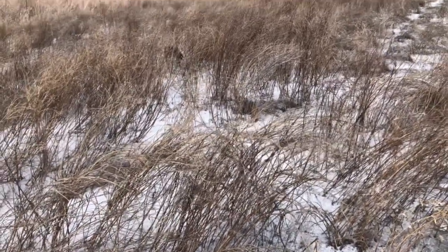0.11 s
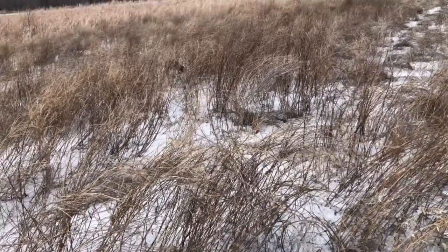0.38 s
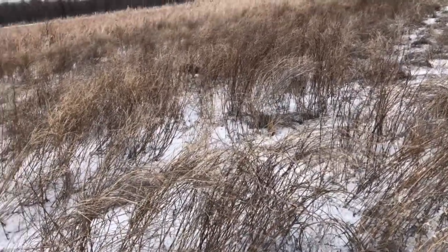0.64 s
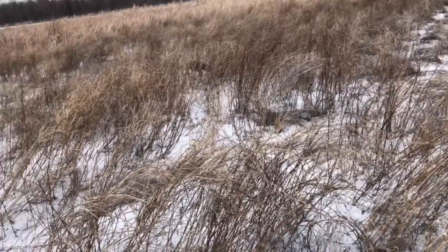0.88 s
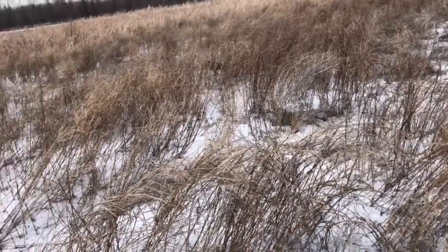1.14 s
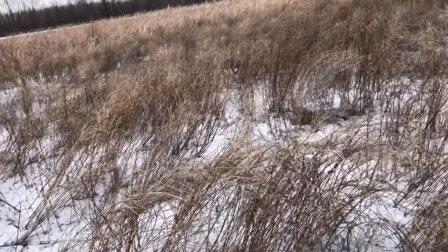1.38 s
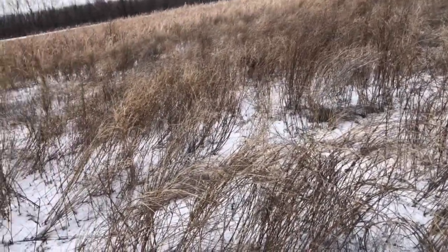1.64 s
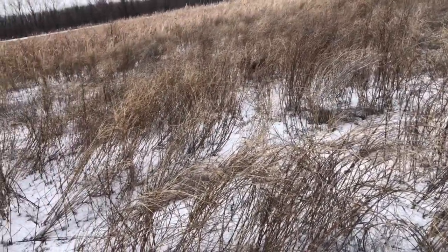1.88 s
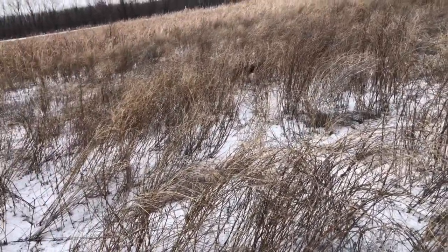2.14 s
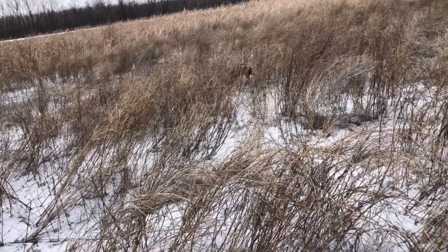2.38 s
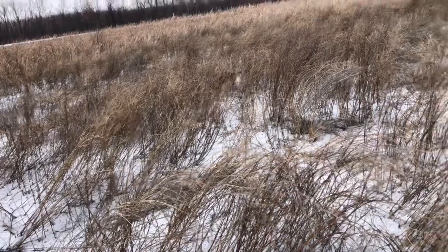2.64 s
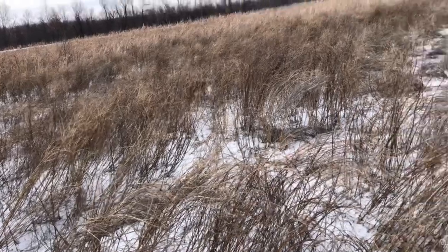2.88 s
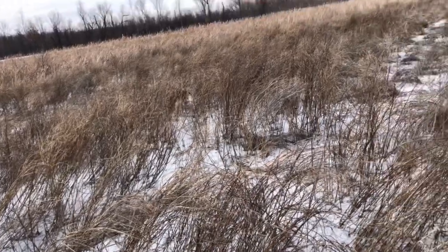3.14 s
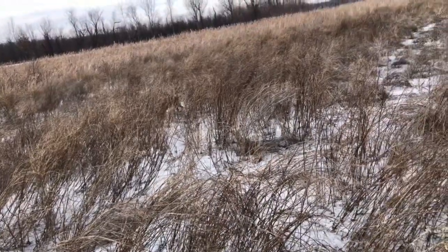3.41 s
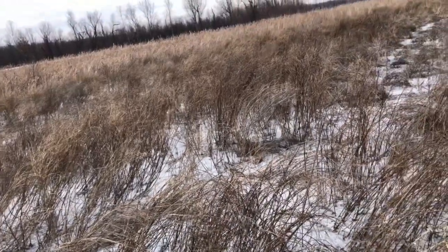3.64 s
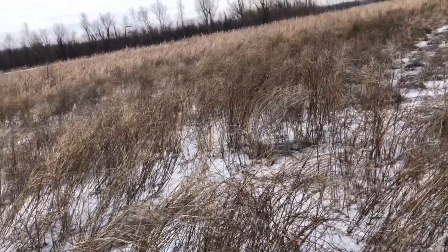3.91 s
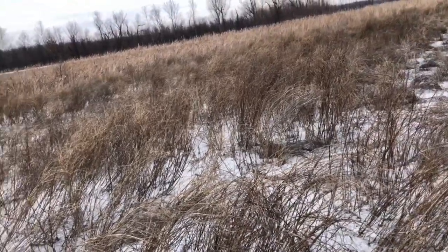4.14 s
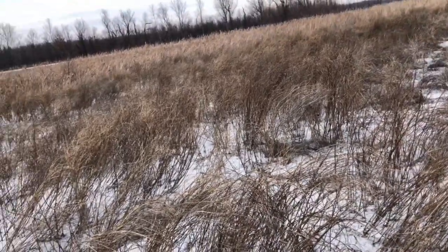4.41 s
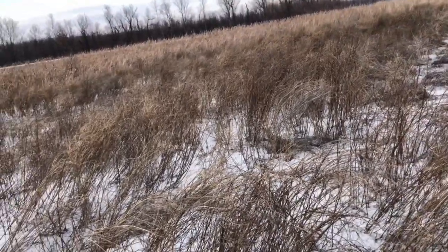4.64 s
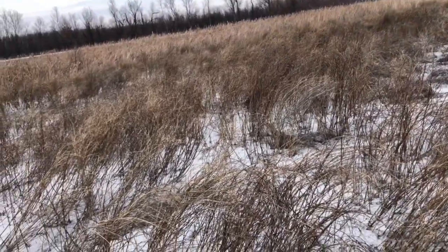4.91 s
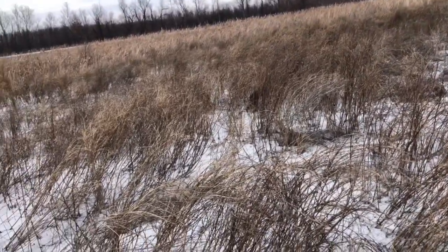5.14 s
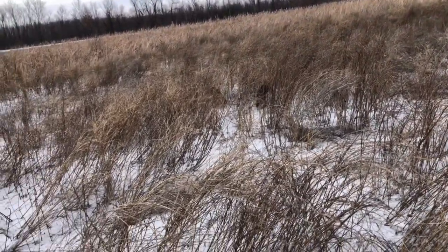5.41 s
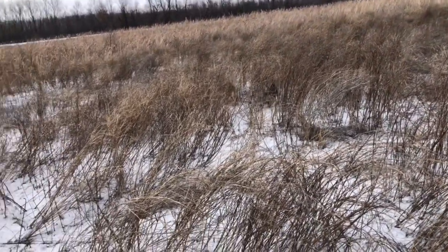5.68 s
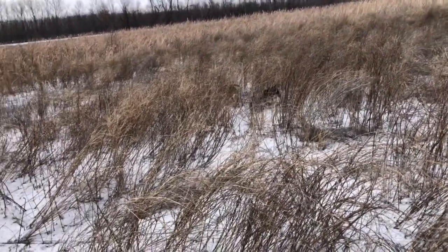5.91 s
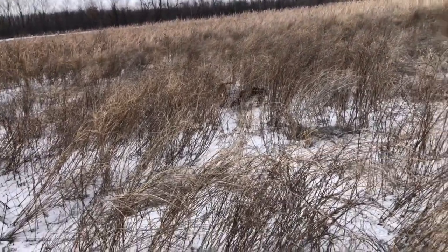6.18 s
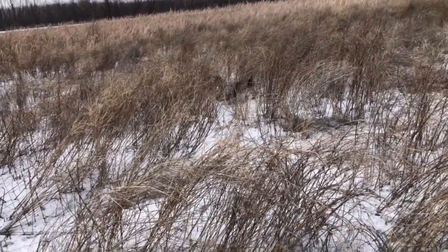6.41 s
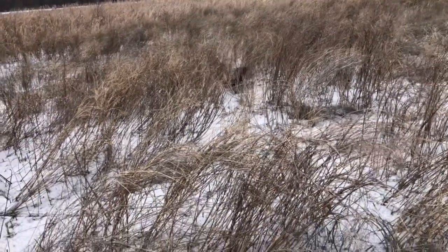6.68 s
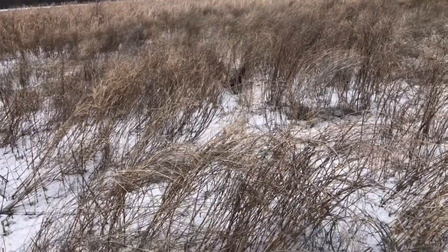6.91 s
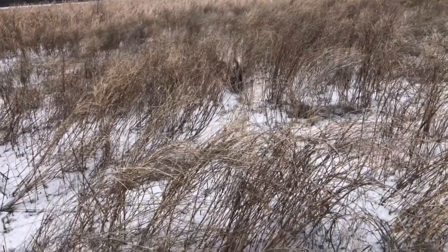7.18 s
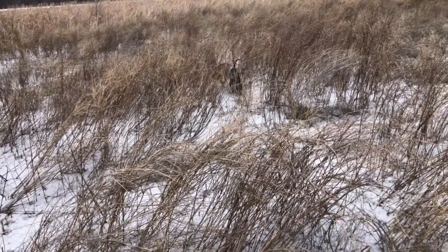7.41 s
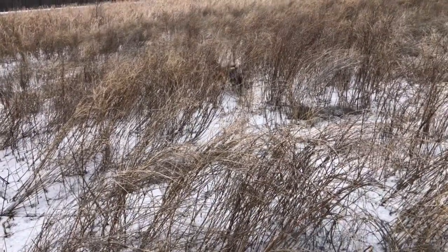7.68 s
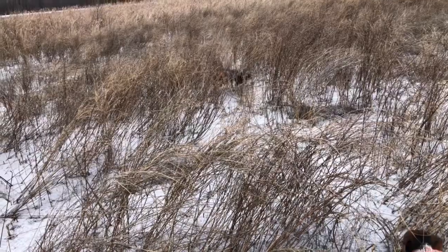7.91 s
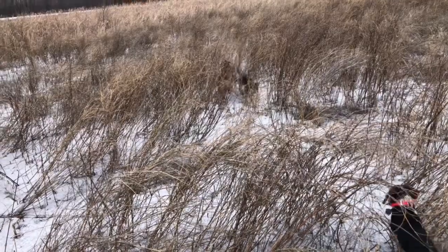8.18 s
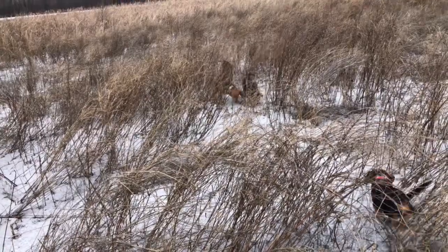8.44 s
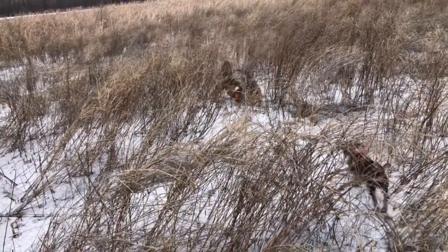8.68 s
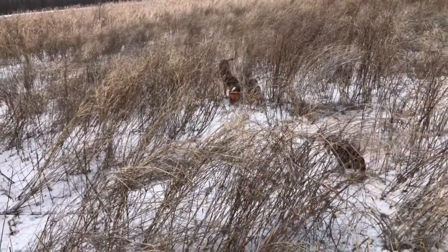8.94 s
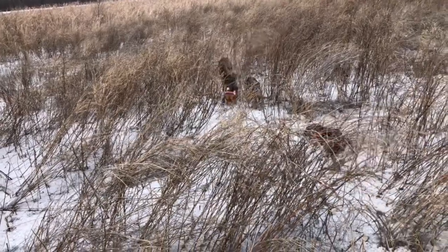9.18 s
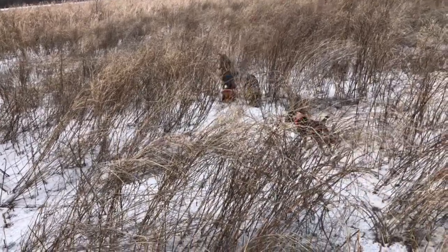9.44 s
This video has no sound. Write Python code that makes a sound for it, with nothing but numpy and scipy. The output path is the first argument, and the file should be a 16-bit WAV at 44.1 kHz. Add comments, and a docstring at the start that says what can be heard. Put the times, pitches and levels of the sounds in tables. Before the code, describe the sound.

An open snowy field, heard through one outdoor microphone for about 9.5 seconds. It begins nearly silent: faint low wind, a small bell clink at 0.1 and 0.3, soft snow crunches and stem ticks from 1.1. At 2.0 a high-voiced hound gives a yip and a hoarse bay of under half a second. Wind swells gently near 3, with tiny yips at 3.2 and 3.6 and paw crunches. A thin wavering whine comes at 4.9, a barely audible whimper at 5.5, then a clear bark at 6.0. The bright collar bell now jingles irregularly, with a snow crunch at 6.4, woody knocks and rustling grass. From 7.1 two hounds bay together; a longer rough bay starts at 7.6, overlapped by barks at 7.7 and 8.3 and squeaky yips at 8.0 and 8.3. Strong barks land at 9.0 and 9.4, bell still clinking. Echo is very faint.

```python
"""Three hounds in a snowy field

They bay, whine, yip and bark: each voice is a stack of partials shaped by a throat, with a rasp where hoarse.
A small collar bell clinks as a sum of dying tones. Paws crunch snow and knock and snap dry stems: short
shaped noises. Grass rustles, wind rumbles on the microphone, and grass and trees return a faint noisy echo."""
import sys
import numpy as np
from scipy import signal
from scipy.fft import rfft, irfft
from scipy.io import wavfile
from scipy.ndimage import uniform_filter1d

SR = 44100
rng = np.random.default_rng(int(sys.argv[2]) if len(sys.argv) > 2 else 0)


def transcribe(u):
    """Save the signal u as a 16-bit wav file named by the first command-line argument.

    u: samples, shape (n,) or (channels, n), limited to [-1, 1]; the rate is SR.
    q: integer samples, one column per channel.
    """
    v = np.clip(np.atleast_2d(u).T, -1, 1)
    q = np.round(v * 32767).astype(np.int16)
    wavfile.write(sys.argv[1], SR, q)


def natural_amplitude(level_db):
    """Convert a level in decibels to a linear amplitude factor, elementwise."""
    exponent = np.asarray(level_db, float) / 20
    return 10 ** exponent


N = 421596
T = np.arange(N) / SR

# resonances of the deep and third hounds' throats: f/Hz, level/dB
DEEP_THROAT = [(1100, 1.5), (1600, 10), (2050, -2.4), (2400, 9.5), (2950, 2.3), (4000, -13.5),
               (8000, -19.5)]
# how every bark opens: t/s from its start, share of pitch, added first and second partial level/dB
BARK_OPENS = [(0, .73, -45, -38), (.019, .86, -15.5, -5.5), (.05, 1, -1, 1.5)]
# how every bark closes: t/s from its end, share of pitch, added first and second partial level/dB
BARK_CLOSES = [(-.045, 0.99, 0, 0.5), (-.024, .9, -16.5, -15), (0, .62, -58, -12.5)]
# thin yips: hound, t/s, length/s, first f/Hz, later f/Hz, level/dB, brightness/dB per octave
YIPS = [("high", 2.003, 0.047, 490, 556, -30.5, 1.2), ("high", 3.245, 0.14, 610, 707, -35, 4.4),
        ("high", 3.578, 0.022, 650, 550, -34, -0.64), ("third", 7.978, 0.037, 1207, 1143, -20, -0.5),
        ("third", 8.015, .03, 990, 810, -26, -20), ("third", 8.33, 0.16, 540, 594, -25, -18)]
SHORT_DULLING_DB = 14  # brightness per octave that a bark, yip or grunt loses by its end


def curve(table):
    """Turns a (t/s, level/dB) table into a gain for every sample."""
    return natural_amplitude(np.interp(T, *np.transpose(table)))


def shape_db(hz, table):
    """Reads a (f/Hz, level/dB) spectrum on a logarithmic pitch axis."""
    f, db = np.transpose(table)
    return np.interp(np.log(np.maximum(hz, 1)), np.log(f), db)


def coloured(table, size=N):
    """Noise with the given spectrum, rms 1."""
    spectrum = rfft(rng.standard_normal(size))
    hz = np.arange(len(spectrum)) * SR / size
    x = irfft(spectrum * natural_amplitude(shape_db(hz, table)), size)
    return x / x.std()


def walk(rate, size=N):
    """Smooth random wandering that turns about rate times a second, spread 1."""
    k = max(int(SR / rate), 2)
    noise = rng.standard_normal(size + 2 * k)
    x = uniform_filter1d(uniform_filter1d(noise, k), k)[k:-k]
    return x * np.sqrt(3 * k / 2)


def add(out, s, x):
    """Mixes x into out from time s."""
    i = int(s * SR)
    out[i:i + len(x)] += x[:len(out) - i]


def band(low_hz, high_hz, order, x):
    """Keeps mainly the part of x between two frequencies; a higher order cuts more steeply."""
    return signal.sosfilt(signal.butter(order, [low_hz, high_hz], "band", fs=SR, output="sos"), x)


def wind():
    """Gusty low rumble on the microphone: coloured noise whose level wanders."""
    # colour of the rumble: f/Hz, level/dB
    rumble_colour = [(20, -19), (70, 3), (230, -9.5), (500, -36.5)]
    # slow rise and fall: t/s, level/dB
    strength = [(0, -59), (2.6, -57), (2.95, -46.5), (3.6, -60.5), (9.56, -56)]
    return coloured(rumble_colour) * curve(strength) * natural_amplitude(3.5 * walk(18))


def field(x):
    """Scattered returns from grass and trees: a fading noise tail far below the direct sound."""
    t = T[:SR]
    fade = np.exp(-t / 0.13) * (1 - np.exp(-t / 0.015))  # swells briefly, then dies away
    tail = coloured([(1500, -15.5), (12000, -44.0)], size=SR) * fade
    return signal.fftconvolve(x, natural_amplitude(-39.0) * tail / np.linalg.norm(tail))[:N]


def grass():
    """A rustle that flickers, random tiny cracks over it, and the louder stems that snap."""
    # colour of the rustle: f/Hz, level/dB
    rustle_colour = [(150, -10.5), (280, 4), (3000, 1), (16000, -1)]
    # rise and fall of rustle and cracks: t/s, level/dB
    strength = [(4.1, -58.5), (4.35, -63), (4.7, -59), (6.3, -55.5), (7.3, -48.5), (9.56, -53)]
    # dry stems that snap: t/s, strength/dB
    snaps = [(1.1196, -28), (1.2067, -27.5), (2.17, -24), (6.7, -29), (7.0152, -22), (8.6018, -24)]
    rustle = coloured(rustle_colour) * natural_amplitude(2.2 * walk(25)) * curve(strength)
    chosen = rng.random(N) < 60 / SR  # about 60 cracks a second
    cracks = chosen * natural_amplitude(10.5 + 4.65 * rng.standard_normal(N)) * curve(strength)
    for s, db in snaps:
        cracks[int(s * SR)] += natural_amplitude(db)
    t = T[:600]
    burst = np.diff(rng.standard_normal(601)) * np.exp(-t / 0.0017)  # every crack is this bright tick
    return rustle + np.convolve(cracks, 0.65 * burst)[:N]


def steps():
    """Snow crust breaking under a paw: a swell of dense low grains."""
    # paw falls: t/s, strength/dB
    falls = [(1.085, -63), (1.463, -57), (3.404, -61.5), (3.617, -54.5), (6.385, -50.5)]
    out, t = np.zeros(N), T[:SR // 4]
    swell = (t / 0.017 * np.exp(1 - t / 0.029)) ** 2
    for s, db in falls:
        crunch = coloured([(200, -6), (1200, -4.0), (2200, -19.5), (16000, -34)], size=len(t))
        grains = natural_amplitude(3 * walk(150, size=len(t)))
        add(out, s - .02, natural_amplitude(db) * grains * swell * crunch)  # the swell begins before the listed time
    return out


def knocks():
    """Stems knocked by passing legs: noise narrowed to a rough woody note that dies in some ten cycles."""
    # knocks: t/s, strength/dB, f/Hz
    hits = [(1.441, -47.5, 840), (5.448, -40, 1070), (5.601, -46.5, 913), (6.628, -43, 1320),
            (6.99, -44.5, 570)]
    out, t = np.zeros(N), T[:SR // 20]
    for s, db, hz in hits:
        ring = band(hz / 1.24, hz * 1.32, 1, rng.standard_normal(len(t)))
        fade = np.exp(-t * hz / 10.2)
        add(out, s, natural_amplitude(db) * ring / ring.std() * fade)
    return out


def bell():
    """Each clapper stroke hits another spot, so the upper modes get new shares; a tick starts it."""
    # strokes: t/s, strength/dB, extra level of the upper modes/dB
    strokes = [(0.121, -49, 3), (0.3195, -54.5, -5), (1.943, -55.5, -5), (4.663, -55, -4),
               (5.701, -46, -21), (5.891, -45, -3), (6.016, -39, 4), (6.047, -41, 5.5), (6.1575, -49.5, 3),
               (6.2643, -43.5, 10.5), (6.357, -38.5, 8), (6.409, -35.5, 1), (6.645, -45, 10),
               (6.7518, -35.5, -1.5), (6.883, -46, 10.5), (7.0238, -42, -9), (7.203, -44, 18.5),
               (7.2604, -37.5, 5), (7.4909, -25.5, 3), (7.5244, -28, 5), (7.5854, -35.5, 0),
               (7.8877, -38.5, -2.5), (8.335, -32.5, 0.5), (8.6404, -33.5, -1.5), (8.7825, -40, 4),
               (8.8584, -32.5, 0.5), (9.188, -42, -27), (9.3343, -47.5, -22), (9.436, -32.5, -7),
               (9.548, -33.5, -6.5)]
    # ringing modes of the bell: f/Hz, level/dB
    modes = [(3153, 8), (5150, -19.5), (6372, -14), (7257, -5.5), (9670, -13), (12160, -6.5), (15150, -10)]
    out, t = np.zeros(N), T[:SR // 4]
    hz, mode_db = np.transpose(modes)[:, :, None]
    t60 = .14 * (hz / hz[0]) ** -.7  # seconds to fall by 60 dB; high modes die sooner
    for s, db, high_db in strokes:
        spot, turn = rng.standard_normal((2, len(modes), 1))
        gain = natural_amplitude(db + mode_db + (hz > hz[0]) * (high_db + 4.6 * spot))
        tones = np.sin(2 * np.pi * hz * (1 + .0015 * turn) * t)
        ring = (gain * tones * 1000. ** (-t / t60)).sum(axis=0)
        noise = np.diff(rng.standard_normal(len(t) + 1))
        tick = natural_amplitude(db + high_db - 0.5) * noise * np.exp(-t / 0.0021)
        add(out, s, ring + tick)
    return out


def flutter(size):
    """Irregular beating at 100-400 a second, spread 1."""
    x = band(110, 420, 2, rng.standard_normal(size))
    return x / x.std()


def dog(calls, brights_db, hoarse_spans, throat):
    """A stack of partials per call; a whine has lost its odd ones, a hoarse stretch beats every few cycles."""
    clear, rasp = np.zeros((2, N))
    for call, (bright_db, dulling_db) in zip(calls, brights_db):
        s, hz, odd_db, even_db = np.transpose(call)
        length = s[-1] - s[0]
        t = np.arange(s[0], s[-1], 1 / SR)
        size = len(t)
        hz, odd, even = (np.interp(t, s, c) for c in (hz, natural_amplitude(odd_db), natural_amplitude(even_db)))
        # the mouth closes as the call ends: brightness changes, resonances get lower
        closing = (t - s[0]) / length
        bright_db = bright_db - dulling_db * closing ** 1.4
        mouth_hz = hz * (1 + 0.22 * closing)

        hoarse, cycles = np.full(size, .08), np.full(size, 2.)
        for a, b, share, count in hoarse_spans:
            inside = (t > a) & (t < b)
            hoarse[inside], cycles[inside] = share, count
        hoarse = np.clip(uniform_filter1d(hoarse, size=300), 0, 1)

        hz = uniform_filter1d(hz, size=400) * (1 + 0.0057 * walk(32.3, size=size))  # unsteady pitch
        phase = 2 * np.pi * np.cumsum(hz) / SR
        shake = 0.27 * flutter(size)
        beat_hz = hz / cycles * (1 + .1 * walk(15, size=size))
        beat_phase = 2 * np.pi * np.cumsum(beat_hz) / SR + 1.1 * walk(70, size=size)
        beat = np.exp(1.1 * np.cos(beat_phase))

        steady, shaken = 0, 0
        for k in range(1, 17):
            db = bright_db * np.log2(k / 2)
            db = db + shape_db(k * mouth_hz, throat) - shape_db(2 * mouth_hz, throat)
            db = db + 4.96 * walk(31.0, size=size) * (k > 2)  # upper partials waver on their own
            if k == 1:
                level = odd
            elif k % 2:
                level = np.minimum(odd, even) * natural_amplitude(db)
            else:
                level = even * natural_amplitude(db)
            steady = steady + level * (1 - hoarse) ** (k / 2) * np.sin(k * phase)
            shaken = shaken + level * np.sin(k * (phase + shake))
        soft_ends = signal.windows.tukey(size, 0.009 / length)
        add(clear, s[0], np.sqrt(2) * steady * soft_ends)
        uneven = natural_amplitude(2.6 * walk(260, size=size))  # no two beats alike
        add(rasp, s[0], 1.304 * hoarse * shaken * (beat - beat.mean()) * uneven)
    # the throat radiates none of the rasp below its lowest resonance, nor in the hollow above the second;
    # the teeth lift its top
    return clear + band(600, 2800, 6, rasp) + natural_amplitude(13) * band(5000, 9000, 6, rasp)


def bark(s, length, open_hz, close_hz, db, second_db):
    """The jaw opens as pitch and level leap up, holds, and shuts as they drop."""
    rows = []
    for at, hz, shape in [(s, open_hz, BARK_OPENS), (s + length, close_hz, BARK_CLOSES)]:
        for dt, share, first, second in shape:
            rows.append((at + dt, hz * share, db + first, db + second_db + second))
    return rows


def arch(s, length, first_hz, later_hz, db, odd_db):
    """A short call: it swells while its pitch slides up or down to a second value, then both sink."""
    # outline: share of length, way from first to later pitch (0-1), added level/dB
    outline = [(0, 0, -33.5), (.4, .75, 0.5), (.78, 1, 1)]
    rows = [(s + length * part, first_hz + way * (later_hz - first_hz), db + fade) for part, way, fade in outline]
    rows.append((s + length, .86 * later_hz, db - 35.5))  # the sagging end
    return [(at, hz, level_db + odd_db, level_db) for at, hz, level_db in rows]


def yips(hound):
    """One hound's thin yips, each with its brightness; their odd partials are nearly gone."""
    return [(arch(*y[1:-1], -56.5), (y[-1], SHORT_DULLING_DB)) for y in YIPS if y[0] == hound]


def third_hound():
    """Yips only: short stacks of partials that swell and sink."""
    return dog(*zip(*yips("third")), [], DEEP_THROAT)


def high_hound():
    """Bays, a whine, a whimper, yips and a grunt, hoarse where the vocal folds beat irregularly."""
    # longer calls, one list each: bays, a whine (4.937 s) and a faint whimper (5.46 s):
    # t/s, f/Hz, odd partial level/dB, even partial level/dB
    long_calls = [
        [(2.035, 613, -37, -21.5), (2.09, 674.6, -16, -23.5), (2.168, 685.7, -16.5, -31.5),
         (2.18, 614.4, -22, -27), (2.36, 586, -21.5, -34.5), (2.378, 727, -16.5, -41), (2.42, 696, -31.5, -41),
         (2.452, 485, -78, -42)],
        [(4.937, 538, -78, -50), (4.99, 695.4, -79, -30.5), (5.07, 690.4, -87, -28), (5.11, 645, -80, -36.5),
         (5.195, 649, -77, -30.5), (5.222, 596, -26.5, -34), (5.27, 615, -36.5, -34.5), (5.285, 646, -45, -29),
         (5.338, 634, -82, -38), (5.36, 391, -74, -74)],
        [(7.077, 495, -58, -60), (7.126, 672, -67, -23), (7.135, 675, -14, -19.5), (7.21, 622.5, -13, -25),
         (7.225, 600, -27, -27), (7.27, 508, -48, -18.5)],
        [(7.64, 699, -33, -64), (7.688, 762, -13.5, -16.5), (7.697, 585, -21, -21), (7.9, 605.8, -25.5, -53),
         (8.015, 580.3, -21.5, -37), (8.04, 646, -12.5, -30.5), (8.17, 587.5, -23, -41),
         (8.23, 637, -14, -31.5), (8.33, 643.5, -12.5, -33.5), (8.385, 562, -27, -67)],
        [(5.46, 322.4, -70, -68), (5.515, 339, -59, -51), (5.53, 377, -62, -57), (5.555, 273, -80, -55)],
    ]
    # brightness of each call: at the start/dB per octave, lost by the end/dB per octave
    long_brights = [(-6.5, 26), (3, 1.5), (-0.5, 6.5), (-3, -5), (6.5, 1)]
    # hoarse stretches: from t/s, to t/s, hoarseness (0-1), cycles per beat
    hoarse_spans = [(2.033, 2.087, 0.67, 3.67), (2.146, 2.175, 0.35, 2.85), (2.192, 2.371, 0.88, 4.36),
                    (7.12, 7.278, 0.23, 3.7), (7.663, 7.697, 0.32, 4.7), (7.74, 7.774, 0.65, 3.94),
                    (8.001, 8.138, 0.3, 2.26), (8.221, 8.335, 0.26, 2.1)]
    # throat resonances: f/Hz, level/dB
    throat = [(1200, 17), (2700, 4.5), (3900, -6), (5500, -14.5), (11000, -33.5)]
    # faint grunts: t/s, length/s, first f/Hz, later f/Hz, level/dB, brightness/dB per octave
    grunts = [(5.773, 0.047, 443, 525, -50.5, -15)]
    calls = list(zip(long_calls, long_brights)) + yips("high")
    calls += [(arch(*g[:-1], 0), (g[-1], SHORT_DULLING_DB)) for g in grunts]
    return dog(*zip(*calls), hoarse_spans, throat)


def deep_hound():
    """One long bay and a row of barks, raspiest while the jaw snaps open and shut."""
    # the bay: t/s, f/Hz, odd partial level/dB, even partial level/dB
    bay = [(7.07, 599, -67, -67), (7.09, 525, -39, -39), (7.23, 585.5, -23.5, -32), (7.3, 512, -30.5, -22),
           (7.35, 520, -31, -18.5), (7.42, 561, -25.5, -22.5), (7.585, 531.5, -39.5, -26.5),
           (7.635, 500, -67, -61)]
    # barks: t/s, length/s, f/Hz once open, f/Hz before closing, level/dB,
    # second partial level above the first/dB, brightness/dB per octave
    barks = [(5.958, 0.15, 553.5, 571.5, -18, -8.5, -1.5), (7.712, 0.2, 491.7, 534.4, -23, 2.5, -14.5),
             (8.278, .17, 542.3, 544.9, -18.5, -6, -9), (8.957, 0.18, 555.2, 568.7, -14.5, -8, -4),
             (9.387, 0.18, 533.7, 528, -17, -10, -9)]
    calls = [(bay, (-22.5, 0))]  # its brightness per octave stays the same
    calls += [(bark(*b[:-1]), (b[-1], SHORT_DULLING_DB)) for b in barks]
    snap, grit = .25, .13  # share of rasp while the jaw moves, and in between
    # later spans replace earlier ones where they overlap
    hoarse_spans = [(b[0], b[0] + b[1], grit, 4) for b in barks]
    hoarse_spans += [(b[0] + b[1] + BARK_CLOSES[1][0], b[0] + b[1], snap, 2) for b in barks]
    hoarse_spans += [(b[0], b[0] + BARK_OPENS[1][0], snap, 3) for b in barks]
    return dog(*zip(*calls), hoarse_spans, DEEP_THROAT)


def scene():
    """The field, the bell, and the pack with its echo, in one channel."""
    surroundings = wind() + grass() + steps() + knocks()
    pack = third_hound() + high_hound() + deep_hound()
    mix = surroundings + bell() + field(pack) + pack
    return mix[None]


def top_cut(x):
    """Nothing passes above the cut-off."""
    return signal.sosfilt(signal.butter(12, 17140, fs=SR, output="sos"), x)


def record(dry):
    """The microphone cuts off just under 16 kHz: a steep low-pass filter."""
    low_pass = signal.ellip(8, .5, 30, 15900, fs=SR, output="sos")
    mix = signal.sosfilt(low_pass, dry)
    return top_cut(mix)


dry = scene()
out = record(dry)
transcribe(out)
```